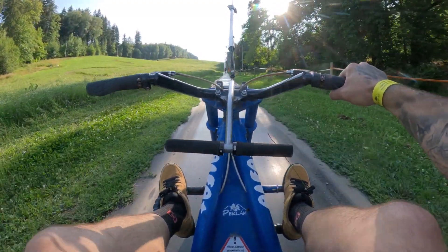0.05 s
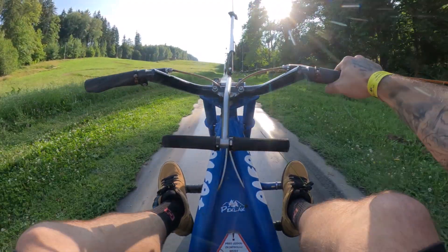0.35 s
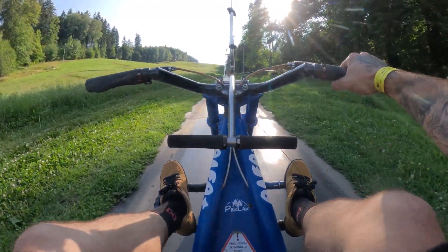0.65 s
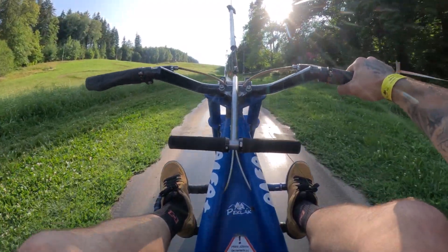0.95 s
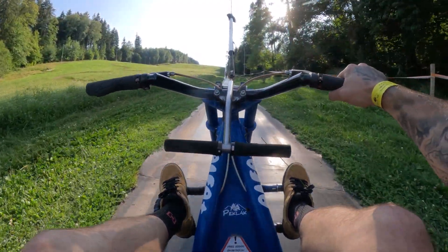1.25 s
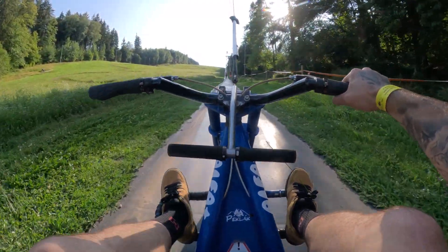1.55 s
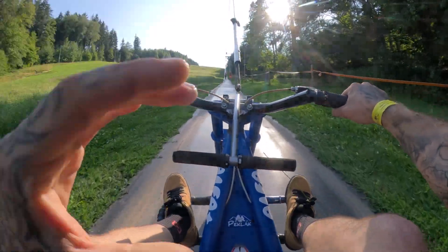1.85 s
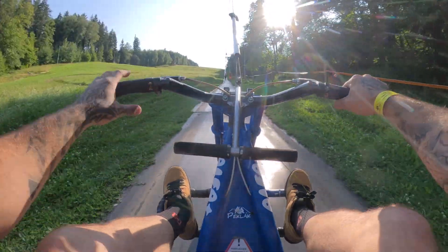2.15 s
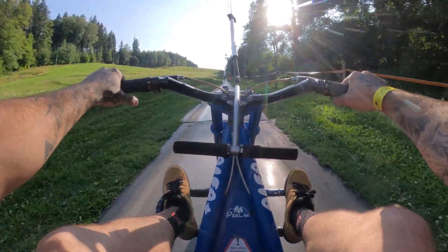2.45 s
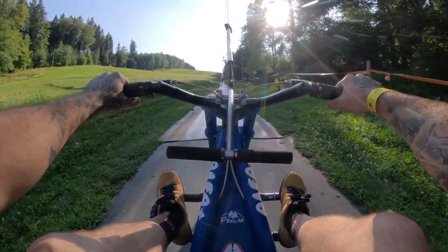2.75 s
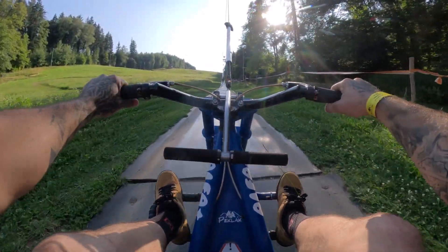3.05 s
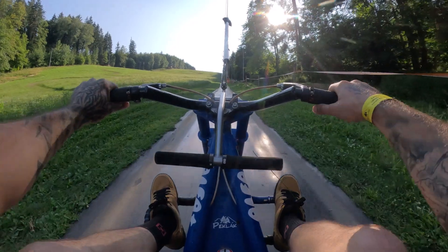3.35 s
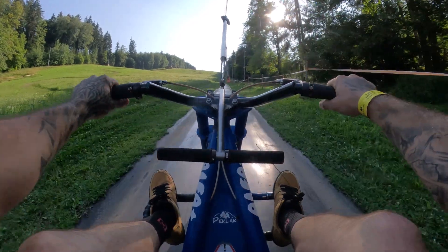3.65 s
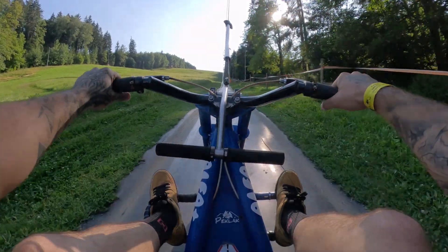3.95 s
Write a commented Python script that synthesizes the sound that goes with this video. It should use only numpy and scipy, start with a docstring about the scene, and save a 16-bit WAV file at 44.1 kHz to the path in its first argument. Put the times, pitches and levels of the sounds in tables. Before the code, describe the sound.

Cart wheels roll over rough paving in the open air with a low rumble and faint gritty hiss. Wind thumps the microphone riding on board, while three brief bouts of knocks and clatter break in, the last one sharpest.

```python
"""On a paved track in the open air, heard from the rider's seat of a rolling three-wheeled cart.
Wind buffets and thumps the microphone. The tyres rumble and hum on the rough paving and keep the
frame ringing; tread and grit hiss. Seams and rough patches knock the wheels and shake loose parts
into short clatters, with small ticks of metal and grit."""
import sys
import numpy as np
from scipy import signal
from scipy.fft import rfft, irfft
from scipy.io import wavfile
from scipy.ndimage import uniform_filter1d

SR = 44100
rng = np.random.default_rng(int(sys.argv[2]) if len(sys.argv) > 2 else 0)


def materialize(psi):
    """Save the field psi as 16-bit PCM at rate SR to the path in sys.argv[1].

    A 1-D psi becomes a single channel; in a 2-D psi each row is a channel.
    """
    bounded = np.clip(np.atleast_2d(psi).T, -1, 1)
    quanta = np.round(bounded * 32767).astype(np.int16)
    wavfile.write(sys.argv[1], SR, quanta)


N = 176400
TIME_S = np.arange(N) / SR

# Envelopes: t/s, relative level/dB
WIND_ENVELOPE = [(0.0, -23.5), (0.12, -41), (0.23, -26.5), (1.11, -26), (1.18, -19.5), (1.4, -35),
                 (1.45, -22.5), (1.53, -29.5), (2.19, -23.5), (2.31, -31.5), (2.45, -24.5), (2.7, -37.5),
                 (2.99, -25), (3.02, -34.5), (3.61, -30.5), (3.7, -25), (4.0, -40)]
RUMBLE_ENVELOPE = [(0, -29), (.13, -34.5), (.26, -25.5), (.4, -26.5), (.45, -32.5), (.7, -32), (.87, -24),
                   (1.05, -28.5), (1.22, -25), (1.5, -30), (1.66, -30), (1.76, -27), (2.33, -31.5),
                   (2.44, -25.5), (2.86, -32.5), (3.15, -28.5), (3.4, -34), (3.53, -30), (4, -33.5)]
FRAME_ENVELOPE = [(0, -49.5), (.19, -43), (.38, -40), (.46, -47), (.73, -50.5), (.84, -42.5), (1, -42.5),
                  (1.2, -39), (1.6, -41.5), (1.82, -36), (2.28, -37), (2.6, -37.5), (3.7, -39.5),
                  (4, -41.5)]
FIZZ_ENVELOPE = [(1.6, -110), (1.95, -85), (2.65, -88.5), (2.9, -82), (3.3, -74.5), (3.55, -79),
                 (3.73, -67), (4, -84)]
# Tyre hiss envelopes: t/s, relative hiss level/dB, relative treble level/dB
HISS_ENVELOPES = [(0, -57.5, -95), (.215, -65, -74), (.25, -44, -53), (.33, -55, -59.5), (.43, -64, -89),
                  (.79, -64.5, -80.5), (.84, -46, -60.5), (.9, -58, -88), (1.135, -54, -73),
                  (1.17, -45, -55.5), (1.33, -50, -61), (1.46, -48.5, -68.5), (1.52, -53.5, -94),
                  (1.61, -52, -71), (1.74, -47, -55.5), (1.85, -47.5, -57), (1.93, -49.5, -62.5),
                  (2.28, -51.5, -63), (2.76, -51.5, -66), (3.03, -57.5, -67.5), (3.27, -53.5, -64.5),
                  (3.48, -56.5, -67.5), (3.8, -55, -61.5), (4, -58.5, -72)]

# Spectral shapes: f/Hz, relative level/dB
WIND_SPECTRUM = [(8, -4), (24, 2.5), (36, -0.5), (50, -4.5), (80, -3.5), (125, -10.5), (200, -15.5),
                 (500, -31.5), (1500, -102.5)]
RUMBLE_SPECTRUM = [(70, -40), (140, -8.5), (185, -4.5), (212, -4), (250, -6), (290, -9), (315, -6),
                   (365, -9.5), (410, -13.5), (480, -24), (800, -27.5), (2500, -94.5)]
FRAME_SPECTRUM = [(280, 3), (450, -3), (570, 3.5), (615, 2), (670, 2.5), (780, -8.5), (880, -14),
                  (1000, -5), (1200, -8.5), (1450, -32), (2200, -32.5), (6000, -82.5)]
HISS_SPECTRUM = [(600, -5), (1300, 4), (1700, 2), (2050, -4), (2400, -5.5), (2950, -7.5), (3500, -9.5),
                 (4400, -17), (5500, -24), (9000, -63)]
TREBLE_SPECTRUM = [(2200, -24), (4000, 12), (5200, 7), (6300, 1.5), (7300, -5.5), (8300, -11), (12500, -38)]
SHEEN_SPECTRUM = [(4000, -20.5), (6500, 1.5), (8400, -9), (9600, -13.5), (12000, -19.5), (14000, -30.5)]
FIZZ_SPECTRUM = [(4000, -25), (7200, 0), (8200, -4), (11000, -7), (12400, 0), (13400, -8), (15000, -22)]
CRACK_SPECTRUM = [(150, 7.5), (500, 12.5), (1000, 1.5), (1700, -6), (2800, -23), (5000, -39), (10000, -71)]
CLATTER_SPECTRUM = [(150, -17.5), (450, 19.5), (650, 15), (950, 9), (1400, 3), (1800, 4.5), (2100, -7),
                    (2400, -5), (2900, -8.5), (3600, -8.5), (4800, -18), (7300, -33.5), (10000, -45.5),
                    (15000, -64)]
TICK_SPECTRUM = [(1000, -29), (3500, -7), (6000, 4.5), (8000, -2), (10500, -8.5), (12500, -4.5),
                 (15000, -28)]

# Frame resonances: f/Hz, bandwidth/Hz, relative level/dB
FRAME_RESONANCES = [(560, 26, -27), (611, 8.9, -17.5), (650, 19, -22.5), (1068, 19, -13)]
# Wheel knocks and low wind thumps on the microphone: t/s, push peak/dB, push time scale/s, crack/dB
KNOCKS_AND_THUMPS = [(0.069, -29.5, 0.0003, -36), (0.246, -9, 0.0014, -24), (.293, -16.5, 0.00033, -29),
                     (0.493, -15.5, 0.0071, -37), (1.252, -15, 0.0011, -49.5), (2.011, -14, 0.0023, -50),
                     (2.05, -21, 0.00024, -30), (2.096, -13.5, 0.00052, -23), (2.426, -18, 0.0018, -49),
                     (2.937, -14.5, 0.0014, -60), (3.607, -17, 0.00029, -22), (3.626, -18, 0.00094, -26.5),
                     (3.677, -17, 0.0003, -24), (3.684, -12, 0.0009, -26), (3.703, -12.5, 0.0051, -48)]
# Loose parts: peak t/s, rise/s, fall/s, level/dB, tilt/(dB/octave), ring f/Hz, ring re chatter/dB
PART_CLATTERS = [(.245, 0.014, 0.0088, -33.5, 3, 1760, -28), (0.299, 0.07, 0.13, -38, -2, 1110, -5),
                 (.351, 0.0095, 0.0066, -28, 1, 2300, -11.5), (.385, 0.069, 0.016, -48, -16, 3720, -5),
                 (0.399, 0.0083, .025, -40, -7, 1130, -31), (0.593, 0.0054, 0.004, -50, 2.5, 1970, -6),
                 (0.769, 0.0033, 0.01, -39.5, 0.5, 3460, -29), (1.074, .002, 0.0043, -44, 5, 2460, -7),
                 (1.946, 0.0068, 0.0083, -36, 0, 1160, -1.5), (2.06, 0.017, 0.017, -40, 3, 3550, -3),
                 (2.058, 0.017, 0.033, -36.5, 5.5, 880, 5.5), (2.198, 0.021, 0.015, -32, 0, 2500, -10),
                 (2.406, 0.008, 0.015, -30.5, -2, 600, -7), (2.44, 0.026, 0.029, -33, 2.5, 2410, -9),
                 (2.4571, 0.0046, 0.0041, -28, 2, 2280, -4), (2.82, 0.012, 0.014, -46, 7.5, 4060, -12),
                 (3.511, 0.0016, 0.003, -37.5, 0.5, 1260, -2), (3.525, 0.0025, 0.0047, -42, 2, 2420, -3),
                 (3.686, 0.0079, 0.007, -23, -5, 970, -7), (3.717, 0.013, 0.011, -32, 2, 1700, -25),
                 (3.751, 0.024, 0.014, -35.5, 0.5, 3300, -8)]
# Metal and grit ticks: t/s, level/dB
GRIT_TICKS = [(.242, -58), (.489, -67), (0.943, -71), (1.982, -55), (2.189, -53), (2.807, -54),
              (2.815, -59), (2.822, -57), (2.829, -54.5), (3.263, -57), (3.564, -59), (3.652, -51.5),
              (3.743, -42.5), (3.752, -48), (3.811, -58), (3.877, -59)]


def amp(db):
    """dB to gain."""
    return 10 ** (np.asarray(db) / 20)


def unit(x):
    """Scale to rms 1."""
    return x / np.sqrt(np.mean(x ** 2) + 1e-20)


def envelope(table, column=1):
    """Gain over time from one dB column."""
    rows = np.array(table)
    return amp(np.interp(TIME_S, rows[:, 0], rows[:, column]))


def colour(x, spectrum, tilt_db_per_oct=0):
    """Filter by a spectrum, tilted about 1 kHz; rms 1."""
    octave = np.log2(np.fft.rfftfreq(len(x), 1 / SR) + 1)
    hz, db = np.transpose(spectrum)
    shape_db = np.interp(octave, np.log2(hz), db, right=-np.inf)
    tilt_db = tilt_db_per_oct * np.maximum(octave - 10, -2)
    return unit(irfft(rfft(x) * amp(shape_db + tilt_db), len(x)))


def drift(rate_hz):
    """Slow random motion; rms 1."""
    ratio = np.fft.rfftfreq(N, 1 / SR) / rate_hz
    return unit(irfft(rfft(rng.standard_normal(N)) * ratio / (1 + ratio ** 3), N))


def grit(per_s, spread_db, size=N):
    """Tiny random impacts of uneven strength; rms 1."""
    strength = amp(spread_db * np.minimum(rng.exponential(1, size), 4))
    return unit(strength * rng.standard_normal(size) * (rng.random(size) < per_s / SR))


def steady(x, span_s):
    """Hold the slow rms at 1, keep the fast lumps."""
    return x / np.sqrt(uniform_filter1d(x ** 2, int(span_s * SR)) + 1e-6)


def add(mix, start_s, sound):
    """Mix a sound in at start_s."""
    part = mix[max(round(start_s * SR), 0):][:len(sound)]
    part += sound[:len(part)]


def wind():
    """Gusts: low, lumpy pressure swings on the microphone."""
    pressure = steady(colour(rng.standard_normal(N), WIND_SPECTRUM), span_s=0.2)
    return amp(-1.05) * envelope(WIND_ENVELOPE) * pressure


def tyre_hum(pitch_hz=220.6, wander=0.05, width_hz=11.1):
    """The rolling tyres resonate: narrow-band noise at a wavering pitch."""
    cycles = np.cumsum(pitch_hz * (1 + wander * drift(rate_hz=3.99))) / SR
    modulation = drift(width_hz) + 1j * drift(width_hz)
    return unit((modulation * np.exp(2j * np.pi * cycles)).real)


def tyre_rumble():
    """Rough paving drums on the tyres; their hum swells with the rumble."""
    hum = amp(-2) * tyre_hum()
    drumming = colour(grit(per_s=3000, spread_db=3.15), RUMBLE_SPECTRUM)
    return amp(-0.5) * steady(drumming + hum, span_s=0.17) * envelope(RUMBLE_ENVELOPE)


def frame_ring():
    """Track roughness rings the frame: a broad band plus narrow resonances."""
    shaking = grit(per_s=4000, spread_db=1.8) * amp(0.94 * drift(rate_hz=29))
    ring = colour(shaking, FRAME_SPECTRUM)
    for hz, width_hz, db in FRAME_RESONANCES:
        _, feedback = signal.iirpeak(hz, hz / width_hz, SR)
        ring += amp(db) * unit(signal.lfilter([1], feedback, grit(per_s=1500, spread_db=2.5)))
    return amp(1.5) * unit(ring) * envelope(FRAME_ENVELOPE)


def tread_hiss():
    """Tread and grit hiss on the paving in four bands that flutter together."""
    flutter = amp(1.1 * drift(rate_hz=19))
    treble_gain = envelope(HISS_ENVELOPES, column=2)
    sheen_gain = amp(-68) * (treble_gain / amp(-58.5)) ** 1.3  # grows faster than the treble
    hiss = colour(grit(per_s=20000, spread_db=1.1), HISS_SPECTRUM) * envelope(HISS_ENVELOPES)
    treble = colour(grit(per_s=14000, spread_db=1.6), TREBLE_SPECTRUM) * treble_gain
    sheen = colour(grit(per_s=20000, spread_db=1.5), SHEEN_SPECTRUM) * sheen_gain
    fizz = colour(grit(per_s=10000, spread_db=2.4), FIZZ_SPECTRUM) * envelope(FIZZ_ENVELOPE)
    return flutter * (amp(3) * hiss + amp(-1.5) * treble + sheen + fizz)


def knock_or_thump(push_db, push_s, crack_db, crack_rise_s=0.0014, crack_decay_s=0.0062):
    """Damped push plus dull crack: a wheel knock if short, a wind thump on the microphone if long."""
    t = TIME_S[:4096]
    phase_rad = t / push_s
    push = phase_rad * np.sin(phase_rad) * np.exp(-phase_rad / 1.52)
    crack_gain = (1 - np.exp(-(t / crack_rise_s) ** 2)) * np.exp(-t / crack_decay_s)
    crack = colour(rng.standard_normal(len(t)), CRACK_SPECTRUM) * crack_gain
    return amp(push_db) * push / abs(push).max() + amp(crack_db) * crack


def clatter(peak_s, rise_s, fall_s, db, tilt_db_per_oct, ring_hz, ring_db):
    """A loose part chatters in a swarm of impacts and rings at its own pitch. Returns start/s, sound."""
    t = TIME_S[:16384] - TIME_S[8192]
    swell = np.exp(-abs(t / np.where(t < 0, rise_s, fall_s)) ** 1.8)
    impacts = grit(per_s=6000, spread_db=3.2, size=len(t))
    chatter = colour(impacts, CLATTER_SPECTRUM, tilt_db_per_oct)
    resonator = signal.iirpeak(ring_hz, Q=5.9, fs=SR)
    ring = unit(signal.lfilter(*resonator, colour(impacts, CLATTER_SPECTRUM)))
    return peak_s + t[0], amp(db) * swell * (chatter + amp(ring_db) * ring)


def tick(db, decay_s=0.0025):
    """Metal or grit: a tiny bright click."""
    t = TIME_S[:2048]
    return amp(db) * colour(rng.standard_normal(len(t)), TICK_SPECTRUM) * np.exp(-t / decay_s)


def scene():
    """Wind, rolling noise and impacts; mono."""
    mix = wind() + tyre_rumble() + frame_ring() + tread_hiss()
    for start_s, *settings in KNOCKS_AND_THUMPS:
        add(mix, start_s, knock_or_thump(*settings))
    for settings in PART_CLATTERS:
        add(mix, *clatter(*settings))
    for start_s, db in GRIT_TICKS:
        add(mix, start_s, tick(db))
    return mix[None]


def record(dry):
    """Low-pass at 15 kHz."""
    lowpass = signal.firwin(511, 15000, window=("kaiser", 9), fs=SR)
    return signal.oaconvolve(dry, lowpass[None], "same")


dry = scene()
out = record(dry)
materialize(out)
```